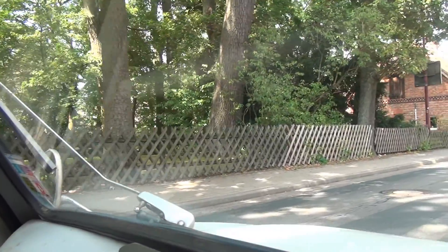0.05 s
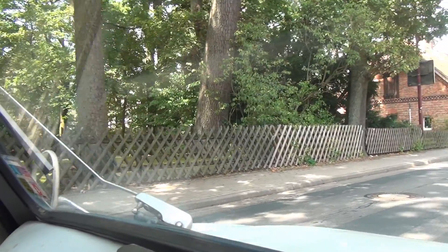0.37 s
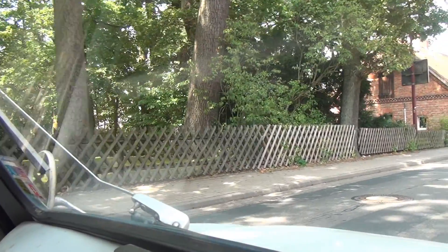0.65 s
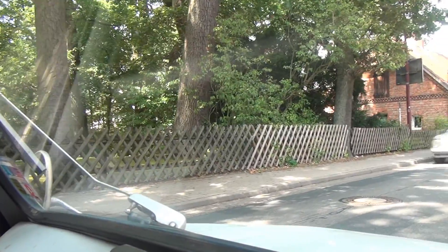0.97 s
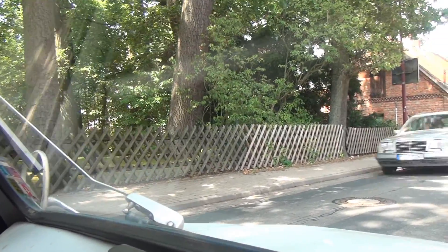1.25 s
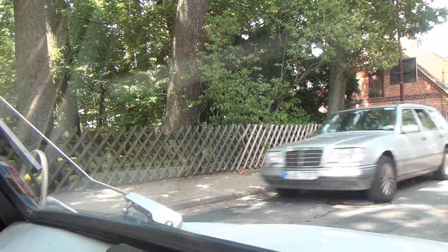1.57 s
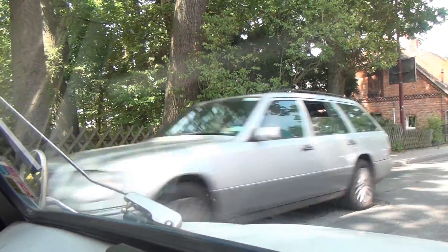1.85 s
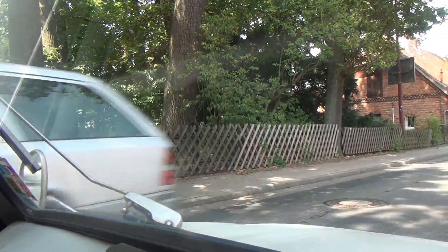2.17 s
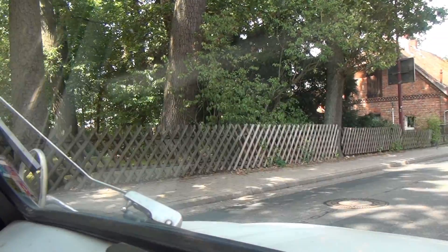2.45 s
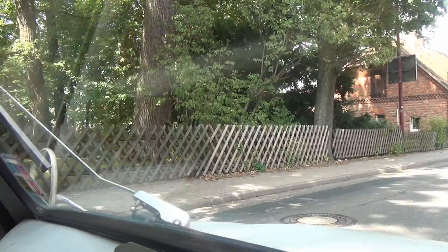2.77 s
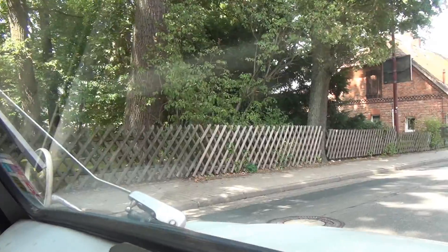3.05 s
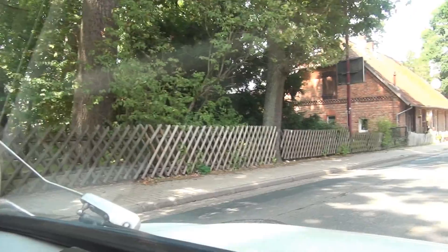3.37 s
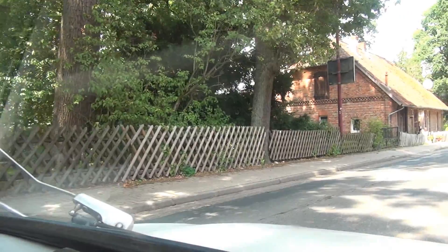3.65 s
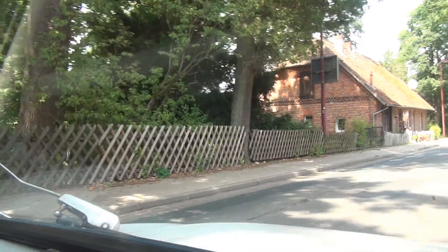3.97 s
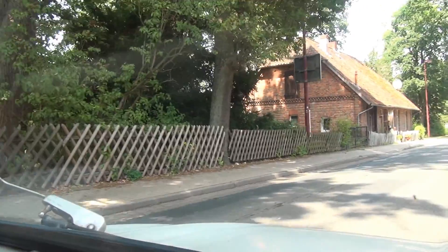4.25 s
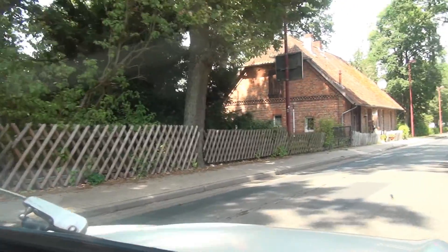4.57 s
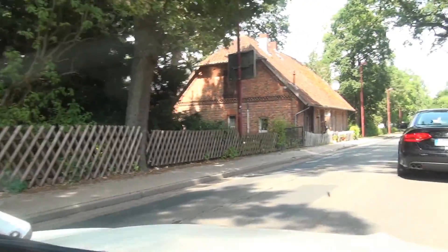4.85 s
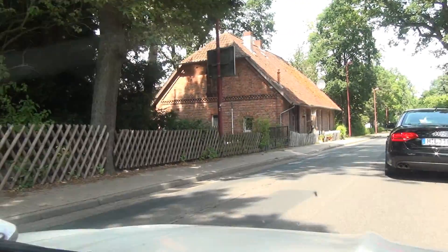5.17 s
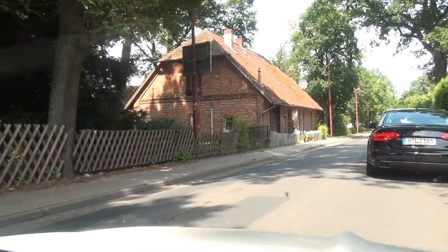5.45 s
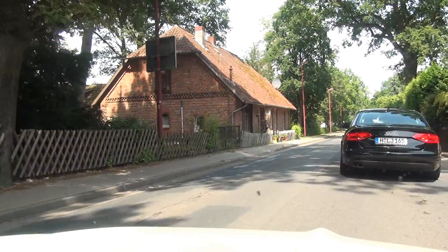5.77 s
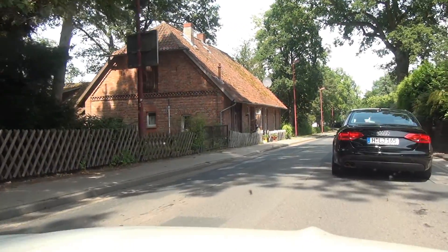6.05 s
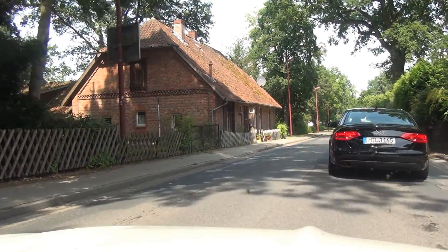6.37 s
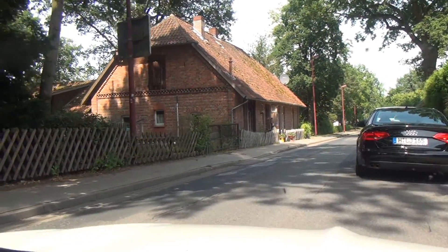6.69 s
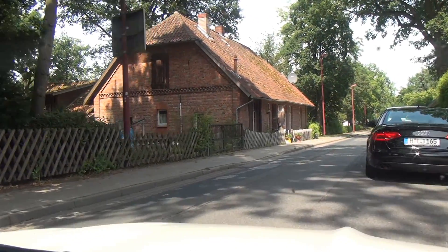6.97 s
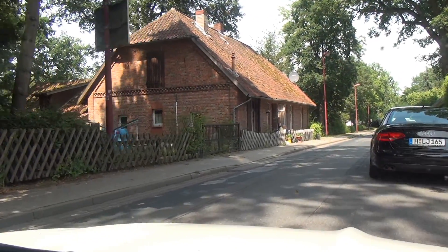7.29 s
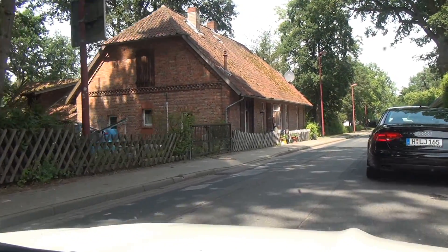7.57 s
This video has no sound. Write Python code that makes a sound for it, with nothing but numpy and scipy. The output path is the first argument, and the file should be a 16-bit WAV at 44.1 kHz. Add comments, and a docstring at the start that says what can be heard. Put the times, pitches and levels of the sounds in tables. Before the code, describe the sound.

A small two-stroke engine burbles with a pulsing lope, heard from inside the car on a village street. Fan rasp, tyre noise and a low rumble lie behind it throughout. Close by, a metal lever clacks four times, in pairs at about 0.5 and 1.2 seconds. Outside, an oncoming car's tyres swell to a roar, peak near 2.4 seconds and fall away quickly by 2.8. The engine then picks up under throttle, stumbling and booming deeply until about 5.2 seconds. During this stretch, road bumps thud through the body and loose trim ticks and rattles. Around 5.5 seconds the engine drops back to its burble, with a brief exhaust bark and a buzzing panel near 6 seconds. It keeps chugging, with a few more light ticks from the trim, until the end at about 7.7 seconds.

```python
"""A two-stroke engine burbles at idle, heard from a stereo pair inside a small car on a village street.
It lopes, one strong burn in every few firings, and the surges come in pairs and ring the cabin air.
Close by, a metal lever clacks four times; outside, a car passes the other way on roaring tyres.
The engine stumbles and booms on throttle for a few seconds, then drops back, while bumps knock the
body and rattle loose trim. Fan and tyre noise lie behind it all."""
import sys
import numpy as np
from scipy.fft import rfft, irfft, next_fast_len
from scipy.io import wavfile
from scipy.ndimage import uniform_filter1d, minimum_filter1d, map_coordinates

SR = 44100
rng = np.random.default_rng(int(sys.argv[2]) if len(sys.argv) > 2 else 0)


def unload_wav(signal):
    """Save mono or channel-first audio to the path in sys.argv[1] as 16-bit WAV at rate SR, clipped to [-1, 1]."""
    wavfile.write(
        sys.argv[1],
        SR,
        np.round(np.clip(np.atleast_2d(signal).T, -1, 1) * 32767).astype(np.int16),
    )


N = 340452

# the engine's lope: (time [s], surges so far [count], firings per surge from then on [count])
LOPE = [(0, 0.6, 4), (2.67, 27, 6), (3.06, 30, 7), (3.61, 34, 7), (3.73, 35, 6), (4.29, 40, 6),
        (5.26, 49, 4), (5.69, 54, 4), (5.89, 56, 4), (6.8, 65, 4), (7.72, 73.8, 4)]
# how the engine runs: (time [s], throttle [0-1], misfiring [0-1])
DRIVE = [(2.7, 0.3, 0.25), (2.9, 0.92, 0.6), (3.3, 0.78, 0.1), (3.55, 0.94, 0.7), (3.8, 0.83, 0.2),
         (4.4, 0.78, 0.87), (5.15, 0.82, 0.93), (5.45, 0.5, 0.26), (5.85, 0.54, 0.43)]
# resonances as they reach the microphones:
# (frequency [Hz], width [Hz], relative level [dB], left over right [dB], left lead [rad])
CABIN_MODES = [(88, 22.5, -9.5, -2.5, 1.75), (114.1, 16.3, -10.5, 11, 1.7), (155, 23, -4, 0.5, 1.45),
               (183.8, 11, -8, -8, 0.75), (203.9, 36.3, -6, 3.5, 1.04)]  # the cabin air
PANEL_MODES = [(273.4, 15.8, 3.5, 2, 1.6), (292.7, 19.6, 3, 1.8, 1.25), (323.2, 24.8, -1.5, 14.3, 2.64),
               (348.3, 26, -7, 2.8, 1.2)]  # the body panels
BUZZ_MODE = [(328.7, 15.6, 0, 13, 1.4)]  # one buzzing panel
SHELL_MODE = [(37.2, 8, 0, 5.5, 0.73)]  # the body shell on its springs
# engine parts that ring: (frequency [Hz], width [Hz], relative level [dB])
FIN_MODES = [(1334, 54, 2), (1620, 300, -2), (2090, 128, 0), (2755, 58, -3.5), (3340, 170, -12),
             (3584, 234, -8)]
INTAKE_MODES = [(574, 53, 7.5), (650, 76, 1), (3220, 800, -11.5)]
# levels in the cabin, before swing and flutter: (time [s], level [dB])
THROB_LEVEL = [(0, -18.5), (2.1, -16), (2.65, -15.5), (2.85, -17), (3.55, -12.5), (4.25, -21), (4.8, -25),
               (5.15, -20), (5.35, -12.5), (5.52, -12), (5.8, -18.5), (7.72, -18)]  # exhaust
GROWL_LEVEL = [(0, -20.5), (2.6, -24), (3.2, -32), (4.2, -25.5), (5.2, -24.5), (5.8, -24.5), (6.5, -23),
               (7.72, -21)]  # body panels
BUZZ_LEVEL = [(0, -35), (2.7, -32.5), (3.3, -31), (5.2, -33.5), (5.8, -21), (6.4, -24.5), (7.0, -27.5),
              (7.72, -37.5)]  # the buzzing panel
SINGING_LEVEL = [(0, -41), (1.2, -44.5), (2.0, -39), (2.5, -30.5), (2.9, -45), (3.6, -66)]  # a narrow band near 1.7 kHz
TYRE_LEVEL = [(0, -30.5), (0.5, -29), (1.1, -30), (1.8, -30), (2.9, -30.5), (3.7, -27.5), (4.1, -30.5),
              (5.1, -30.5), (5.65, -28.5), (6.2, -31.5), (7.72, -30)]  # own tyres on a changing surface
# fan and cylinder noise: (time [s], relative rasp level [dB], hiss level [dB])
FAN_LEVEL = [(0, -33, -55.5), (1, -34.5, -56.5), (3.8, -34.5, -57), (4.7, -35, -58.5), (5.6, -34, -56.5),
             (6.3, -34.5, -55.5), (7.72, -33, -53.5)]
# how far the clatter swings with each surge: (time [s], swing [dB])
CLATTER_SWING = [(0, 0.2), (2.6, 1.8), (4.5, 1.3), (5.5, 0.5), (5.9, 1.7), (7.72, 1.4)]
# fits of the exhaust under throttle: (time [s], relative peak [dB], frequency [Hz])
BOOMS = [(2.82, -26, 49), (2.946, -6.5, 47), (3.032, -11.5, 56.6), (3.153, -10, 60), (3.259, -27, 52.5),
         (3.337, -17, 53), (3.429, -22, 51), (3.55, -14, 49.4), (3.693, -10, 55.5), (3.781, -7.5, 57),
         (3.893, -9.5, 60), (4.019, -10, 50.7), (4.108, -13, 48), (4.176, -12, 47.3), (4.272, -14, 52.4),
         (4.34, -12.5, 52), (4.481, -9.5, 52.4), (4.591, -15, 57.6), (4.688, -12.5, 57.3),
         (4.859, -13, 50.7), (4.92, -14.5, 51.6), (5.13, -18, 48.6)]
# strokes of the lever: (time [s], ring level [dB], knock level [dB])
CLACKS = [(0.5234, -19, -10.5), (0.632, -20, -10), (1.1308, -21.5, -7), (1.2718, -21, -8)]
# the metal lever and its hollow mount: (frequency [Hz], relative level [dB], t60 [s], attack [s])
LEVER_MODES = [(1164, 6.5, 0.084, 0.011), (1910, -10, 0.1, 0.002), (2400, -2.5, 0.082, 0.0022),
               (2670, -9, 0.061, 0.002), (3150, -7.5, 0.091, 0.002), (3920, -20, 0.055, 0.001),
               (11150, -23, 0.078, 0.0004), (11270, -28, 0.089, 0.0004)]
MOUNT_MODES = [(620, 0, 0.059, 0.0012), (695, -6, 0.09, 0.0026), (883, -15.5, 0.06, 0.001)]
# loose trim making contact, relative levels: (time [s], tick [dB], sizzle [dB], clink [dB])
TICKS = [(0.7971, -35, -54, -57), (2.82, -37, -52, -53), (3.076, -28.5, -41.5, -41),
         (3.1303, -29.5, -46, -48), (3.1642, -40, -56, -59), (3.2131, -36, -54, -50),
         (3.283, -32, -52, -61), (3.328, -32, -46, -50), (3.4994, -41, -60, -54), (3.53, -41, -60, -55),
         (3.81, -42, -63, -61), (3.872, -38, -62, -61), (3.926, -40, -62, -57), (4.0941, -37, -63, -55),
         (4.319, -39, -48, -42), (4.338, -61, -58, -50), (4.426, -34.5, -65, -54),
         (4.4556, -36, -68, -40.5), (4.554, -43, -64, -54), (4.685, -37.5, -66, -51),
         (4.745, -48, -57, -50), (4.9561, -55, -71, -45), (5.063, -46, -66, -46), (5.093, -35, -59, -44),
         (5.101, -38, -50, -48), (5.134, -52, -66, -49), (5.175, -38, -52, -54), (5.217, -53, -68, -51),
         (5.246, -52, -62, -50), (6.2776, -32, -49, -44), (7.0978, -54, -54, -63), (7.186, -42, -51, -50),
         (7.3294, -58, -56, -59)]
# road bumps knocking the body: (time [s], level [dB])
BUMPS = [(2.862, -10), (2.889, -10), (3.012, -15.5), (3.076, -12), (3.113, -11.5), (3.14, -13),
         (3.284, -12), (3.55, -21), (3.666, -7), (3.786, -16.5), (3.876, -13), (3.982, -17), (4.455, -19),
         (4.565, -16), (4.683, -19), (5.034, -23), (5.222, -12.5), (5.488, -15)]
# noise spectra at the microphones: (frequency [Hz], relative density [dB])
FAN_SPECTRUM = [(600, 0.5), (900, 2), (1150, -2), (1400, -2), (1700, -4), (1930, -6.5), (2400, -6),
                (3100, -9.5), (3700, -11.5), (4050, -13.5), (4450, -24.5), (5000, -35.5), (6000, -85)]  # cooling fan
HISS_SPECTRUM = [(3500, -21), (4700, -1), (6000, 3.5), (7000, 2), (8000, 3.5), (9000, -2.5), (9700, -7),
                 (11500, -6), (13500, -11), (15500, -25)]  # the fan's treble and small chattering parts
SCRAPE_SPECTRUM = [(1500, -20), (2600, 7), (3900, -10), (4900, -21.5), (9000, -21), (14000, -41)]  # lever between notch and stop
JUDDER_SPECTRUM = [(1300, -14), (1750, 3.5), (2500, -2), (3150, 3), (3600, -10), (3900, 3.5), (4400, -12),
                   (5000, -30), (8000, -17), (10000, -29), (11200, -14), (12200, -39), (15000, -37)]  # lever against its stop
ROAR_SPECTRUM = [(200, -4), (440, 13.5), (650, 3.5), (850, 10.5), (1000, -2.5), (1150, 1.5), (1340, 3.5),
                 (1530, 5), (1800, -7), (2000, -0.5), (2250, -9), (2780, -4.5), (3150, -7.5), (3700, -8.5),
                 (4800, -28.5), (7000, -72)]  # the other car's tyres
TREAD_SPECTRUM = [(3500, -5), (4800, -8.5), (6300, -2.5), (8000, -3), (9800, -14), (12300, -12.5),
                  (15500, -29)]  # their tread hiss
BUMP_SPECTRUM = [(120, -21), (310, 16.5), (480, 2), (590, 7.5), (850, -2), (1300, -10.5), (2050, -6.5),
                 (2600, -13), (3300, -15), (5000, -66)]  # knocked bodywork
TICK_SPECTRUM = [(900, -23), (1900, 18.5), (2600, 12.5), (3700, 14), (4800, -0.5), (7000, -6), (7900, 6.5),
                 (9200, -7), (12000, -36), (15500, -35)]  # loose trim
SIZZLE_SPECTRUM = [(7000, -19), (10500, 4), (12500, 1), (14500, -7), (15600, -15)]  # the top of each tick
TYRE_SPECTRUM = [(200, -12), (400, 3.5), (490, 0.5), (560, 3.5), (700, -2), (840, 1.5), (960, -9.5),
                 (1250, -13.5), (2000, -14.5), (4000, -50.5)]  # own tyres
RUMBLE_SPECTRUM = [(15, -22), (30, 0.5), (52, 5), (69, -2), (92, 4.5), (140, -2), (190, 0), (243, -11.5),
                   (330, -2.5), (420, -21.5), (700, -69)]  # low cabin rumble
# how alike cabin noise is at the two microphones: (frequency [Hz], coherence [0-1])
COHERENCE = [(60, 0.42), (360, 0.48), (640, 0.71), (1200, 0.71), (2100, 0.93), (3700, 0.89), (4800, 0.41)]
# which side it favours: (frequency [Hz], left over right [dB])
BALANCE = [(60, 10), (300, 3), (600, -0.5), (1000, -1), (3800, 0.3), (5000, 6), (14000, 1.5)]
# the pair widens and narrows the treble: (frequency [Hz], side gain [dB])
STEREO_WIDTH = [(4000, 0), (5000, 11), (6100, 8.5), (7300, -1), (8500, -3), (9600, 12), (11000, 0),
                (12000, 3.5)]


def crank():
    """Firings and surges counted since the start; the flywheel smooths each change of speed."""
    t = np.arange(N) / SR
    times, surges, per_surge = np.transpose(LOPE)
    surge = np.interp(t, times, surges)
    step = np.gradient(surge) * per_surge[np.searchsorted(times, t, side="right") - 1]
    cycle = surges[0] * per_surge[0] + np.cumsum(uniform_filter1d(step, size=5000))
    return cycle + 0.034 * wobble(14), surge


def exhaust_throb(cycle, surge):
    """The exhaust throbs at the firing rate; misfires lose the note and shake the shell at its own pitch."""
    _, misfire = curves(DRIVE)
    steady = np.sqrt(2) * np.real(mic_pair(5.2, 1.2) * amp(0.46 * wobble(30)) * np.exp(2j * np.pi * cycle))
    lurch = resonate(firings(cycle, scatter=0.56, jitter_s=0.001, puff=0.61), SHELL_MODE)
    throb = np.sqrt(1 - misfire ** 2) * steady + misfire * lurch
    return amp(curves(THROB_LEVEL)[0] + lope(surge, -0.25)) * throb


def cabin_drone(cycle, surge):
    """Strong and weak burns ring the air around the microphones; every other surge is stronger."""
    _, misfire = curves(DRIVE)
    burn = amp(5.3 * lope(surge, 0.25) + 2 * lope(surge / 2, 0))
    drone = resonate(burn * firings(cycle, scatter=0.45, jitter_s=0.0008, puff=0.15), CABIN_MODES)
    return amp(-22 - 3 * misfire + 0.68 * lope(surge, 0.031) + 0.27 * wobble(22)) * drone


def chug(surge):
    """Each surge swells the cabin's main resonance and lets it die, a little different every time."""
    throttle, _ = curves(DRIVE)
    times, surges, _ = np.transpose(LOPE)
    nearest = np.round(surge).astype(int)
    size, detune, shift = rng.standard_normal((nearest[-1] + 1, 3))[nearest].T
    since = np.arange(N) / SR - np.interp(nearest, surges, times)
    alternate = (-1.0) ** nearest  # the lope repeats in pairs
    hz = 116.6 - 11 * throttle + 3 * alternate + 0.9 * detune
    phase = 0.5 * alternate + 0.25 * shift
    note = np.real(mic_pair(2.1, 1.0) * np.exp(1j * (2 * np.pi * hz * since + phase)))
    envelope = amp(0.9 * size) * np.cos(np.pi * (surge - nearest))
    return amp(-20 - 0.5 * throttle) * unit(envelope * note)


def exhaust_booms(half_length_s=0.024, gain_db=2.1):
    """Each fit of the exhaust swells the lowest standing waves of the cabin for a few cycles."""
    t, out = np.arange(N) / SR, np.zeros((2, N))
    for (time, db, hz), (phase, lead) in zip(BOOMS, rng.random((len(BOOMS), 2))):
        near = np.abs(t - time) < 4 * half_length_s
        since = t[near] - time
        note = np.real(mic_pair(5.7, 1.4 + 1.05 * lead) * np.exp(2j * np.pi * (hz * since + phase)))
        out[:, near] += amp(db + gain_db) * np.exp(-(since / half_length_s) ** 2 / 2) * note
    return out


def exhaust_bark(cycle, surge, bark_s=6, half_length_s=0.12):
    """The exhaust's fourth harmonic hums at idle and barks briefly with the surges around 6 s."""
    throttle, _ = curves(DRIVE)
    window = np.exp(-((np.arange(N) / SR - bark_s) / half_length_s) ** 2 / 2)
    bark = amp(-25 + 12 * lope(surge, 0.52) + 1.3 * wobble(21.1)) * window
    hum = amp(-31 + 0.89 * wobble(6.9)) * (1 - throttle)
    return (bark + hum) * np.sqrt(2) * np.real(mic_pair(4.0, 1.3) * np.exp(2j * np.pi * 4 * cycle))


def panels(cycle, surge):
    """Firings and their gas noise shake the body panels into a growl; one panel buzzes along."""
    throttle, _ = curves(DRIVE)
    growl = resonate(firings(cycle, scatter=0.64, jitter_s=0.00071, puff=0.5), PANEL_MODES)
    buzz = resonate(firings(cycle, scatter=0.21, jitter_s=0.00083, puff=0.44), BUZZ_MODE)
    swing_db = 2.9 * (1 - throttle) * lope(surge, -0.54) + 2 * limp(surge) + 0.6 * wobble(22)
    return amp(curves(GROWL_LEVEL)[0] + swing_db) * growl + amp(curves(BUZZ_LEVEL)[0]) * buzz


def engine_clatter(cycle, surge):
    """The fan rasps and the fins and intake ring with each firing, swelling with the lope."""
    throttle, _ = curves(DRIVE)
    fan_db, hiss_db = curves(FAN_LEVEL)
    firing_db = 0.35 * np.cos(2 * np.pi * cycle)
    surge_db = curves(CLATTER_SWING)[0] * lope(surge, 0.042 + 0.28 * throttle) + 0.7 * limp(surge)
    rasp = amp(firing_db + wobble(130) + surge_db)
    fan = amp(fan_db + 1.6) * unit(rasp * rush(FAN_SPECTRUM))
    slap = amp(firing_db + 1.96 * wobble(40) + 0.9 * surge_db)
    fins = amp(fan_db - 6 + throttle) * unit(slap * ring(FIN_MODES))
    hiss = amp(hiss_db) * unit(rasp ** 0.39 * amp(1.2 * wobble(29)) * rush(HISS_SPECTRUM))
    intake = amp(-32) * throttle ** 2 * unit(slap * ring(INTAKE_MODES))
    # a narrow band sings, pulsing with the firings and swelling as the other car passes
    singing = amp(curves(SINGING_LEVEL)[0]) * unit(slap * ring([(1728, 220, 0)]))
    return fan + fins + hiss + intake + singing


def lever(stop_delay_s=0.0168):
    """Close by, the lever rings out of its notch, scrapes, then knocks its mount and judders at the stop."""
    times, ring_db, knock_db = np.transpose(CLACKS)
    stops = times + stop_delay_s
    scrape = blows(times, ring_db - 3, attack=0.0095, t60=0.18)
    scrape = scrape * amp(3 * wobble(400)) * rush(SCRAPE_SPECTRUM)
    judder = blows(stops, ring_db - 4, attack=0.003, t60=0.091)
    judder = judder * unit(amp(2.5 * wobble(300)) * rush(JUDDER_SPECTRUM))
    return struck(times, ring_db, LEVER_MODES) + scrape + judder + struck(stops, knock_db, MOUNT_MODES)


def oncoming_car(nearest_s=2.283, distance_over_speed_s=0.45, hidden_s=2.733, fade_s=0.035):
    """Outside, another car's tyres roar and hiss past until it slips behind the bodywork."""
    t = np.arange(N) / SR
    roar = rush(ROAR_SPECTRUM)
    # the bounce off the road lags most when the car is nearest, so a comb sweeps down and back up
    lag_s = 0.001106 / np.hypot(1, (t - nearest_s) / distance_over_speed_s)
    bounce = np.array([np.interp(t - lag_s, t, channel) for channel in roar])
    tyres = amp(-20.5) * swell(peak_s=2.457, rise_s=0.29, fall_s=0.26) * unit(roar + 0.28 * bounce)
    tread = amp(-45) * swell(peak_s=2.32, rise_s=0.17, fall_s=0.26) * rush(TREAD_SPECTRUM)
    in_view = (1 - np.tanh((t - hidden_s) / fade_s / 2)) / 2
    flutter = amp(0.7 * wobble(29.98) + 0.68 * wobble(140))
    return in_view * flutter * (tyres + tread)


def bumps():
    """Road bumps thud in the body, their attack softened by tyres and springs."""
    times, levels_db = np.transpose(BUMPS)
    return blows(times, levels_db, attack=0.007, t60=0.11) * rush(BUMP_SPECTRUM)


def loose_trim(bounce_s=0.015, bounce_db=-14, chatter_from_s=3.1, chatter_to_s=7.5):
    """Trim around the cabin ticks and bounces once; small parts chatter faintly in between."""
    times, tick_db, sizzle_db, clink_db = np.transpose(TICKS)
    contacts = np.r_[times, times + bounce_s]
    tick = blows(contacts, np.r_[tick_db, tick_db + bounce_db] + 3.5, attack=0.00055, t60=0.078)
    sizzle = blows(contacts, np.r_[sizzle_db, sizzle_db + bounce_db] + 4, attack=0.0003, t60=0.043)
    clink = blows(times, clink_db + 2.5, attack=0.0003, t60=0.048)
    trim = tick * rush(TICK_SPECTRUM) + sizzle * rush(SIZZLE_SPECTRUM) + clink * ring([(5730, 2500, 0)])
    when, force = rng.random((45, 2)).T
    chatter_times = chatter_from_s + when * (chatter_to_s - chatter_from_s)
    chatter = blows(chatter_times, -60 + 14 * force ** 2, attack=0.0003, t60=0.016)
    return trim + chatter * rush(HISS_SPECTRUM)


def road_noise():
    """Under the floor, the car's own tyres roar on the road, over a steady low rumble."""
    flutter = amp(1.35 * wobble(20) + 0.8 * wobble(60))
    tyres = amp(curves(TYRE_LEVEL)[0]) * unit(flutter * rush(TYRE_SPECTRUM))
    return tyres + amp(-20) * rush(RUMBLE_SPECTRUM)


def firings(cycle, scatter, jitter_s, puff):
    """One pressure pulse per firing, uneven in size and time, each followed by a puff of gas noise."""
    starts = np.flatnonzero(np.diff(np.floor(cycle)) > 0)
    size, delay = rng.standard_normal((len(starts), 2)).T
    at = np.clip(starts + jitter_s * SR * delay, 0, N - 1).astype(int)
    pulses = np.bincount(at, np.abs(1 + scatter * size), N)
    gas = np.exp(-2 * (cycle % 1)) * rng.standard_normal(N)
    return unit(pulses) + puff * unit(gas)


def lope(surge, lead):
    """A swing (-1 to 1) that peaks ahead of the chug by lead, a share of one surge."""
    return np.cos(2 * np.pi * (surge + lead))


def limp(surge):
    """The swing of three lighter beats in each pair of surges; throttle evens it out."""
    throttle, _ = curves(DRIVE)
    return np.clip(2 * (1 - throttle), 0, 1) * lope(surge * 3 / 2, 0)


def resonate(x, modes):
    """x rings modes that reach each microphone differently; slow swells are levelled to rms 1."""
    ringing = unit(filtered(x, lambda f: sum(amp(db) * resonance(f, hz, width) * mic_pair(side_db, lead)
                                             for hz, width, db, side_db, lead in modes)))
    power = uniform_filter1d(uniform_filter1d(np.mean(ringing ** 2, axis=0), size=2600), size=1800)
    return ringing / np.sqrt(np.abs(power) + 1e-6)


def struck(times, levels_db, modes):
    """Blows set an object's modes ringing, a little differently each time."""
    out, t = np.zeros((2, N + SR)), np.arange(SR // 4) / SR
    for time, db, chance in zip(times, levels_db, rng.standard_normal((len(times), len(modes), 3))):
        for (hz, mode_db, t60, attack), (size, detune, phase) in zip(modes, chance):
            note = np.exp(2j * np.pi * (hz * (1 + 0.0031 * detune) * t + phase))
            envelope = amp(db + mode_db + size - 60 * t / t60) * (1 - np.exp(-t / attack))
            out[:, int(time * SR):][:, :len(t)] += envelope * np.real(mic_pair(-0.88, 0.69) * note)
    return out[:, :N]


def blows(times, levels_db, attack, t60):
    """The envelope of blows that rise fast and die away; attack and t60 are in seconds."""
    power, t = np.zeros(N + SR), np.arange(SR // 2) / SR
    shape = (1 - np.exp(-t / attack)) * amp(-60 * t / t60)
    for time, db in zip(times, levels_db):
        power[int(time * SR):][:len(t)] += (amp(db) * shape) ** 2
    return np.sqrt(power[:N])


def swell(peak_s, rise_s, fall_s):
    """A gain that climbs to 1 and sinks again; rise and fall are the times to half power."""
    t = np.arange(N) / SR - peak_s
    return 1 / (1 + (np.sqrt(2) - 1) * (t / np.where(t < 0, rise_s, fall_s)) ** 2)


def cabin_noise(gain):
    """Noise of rms 1, partly alike at the two microphones, coloured by a gain of frequency."""
    def mid_side_gain(f):
        angle = np.arccos(along(COHERENCE, f)) / 2
        return gain(f) * np.array([np.cos(angle), np.sin(angle)])
    mid, side = filtered(rng.standard_normal((2, N)), mid_side_gain)
    return unit(filtered(np.array([mid + side, mid - side]), lambda f: mic_pair(along(BALANCE, f), 0)))


def rush(spectrum):
    """Cabin noise with a broad spectrum."""
    return cabin_noise(lambda f: amp(along(spectrum, f)))


def ring(modes):
    """Cabin noise held in resonances."""
    return cabin_noise(lambda f: sum(amp(db) * abs(resonance(f, hz, width)) for hz, width, db in modes))


def mic_pair(balance_db, lead_rad):
    """Complex gains at the two microphones: the left is louder by balance_db and ahead by lead_rad."""
    sign = np.array([[0.5], [-0.5]])
    return amp(sign * balance_db) * np.exp(1j * sign * lead_rad)


def resonance(f, hz, width):
    """A resonance with steep skirts."""
    return (1j * f * width / (hz * hz - f * f + 1j * f * width)) ** 2


def filtered(x, response):
    """x through a complex response of frequency."""
    size = next_fast_len(N + SR // 2)
    return irfft(rfft(x, size) * response(np.fft.rfftfreq(size, 1 / SR)), size)[..., :N]


def wobble(rate):
    """A smooth random curve, rate knots a second."""
    return map_coordinates(rng.standard_normal(4096), [np.arange(N) * rate / SR], mode="mirror")


def curves(rows):
    """One value per sample for each column after the time."""
    times, *columns = np.transpose(rows)
    return [np.interp(np.arange(N) / SR, times, column) for column in columns]


def along(points, hz):
    """Interpolates (frequency, value) points on a log axis."""
    freqs, values = np.transpose(points)
    return np.interp(np.log(hz + 1), np.log(freqs), values)


def amp(db):
    """Decibels to amplitude."""
    return 10 ** (np.asarray(db) / 20)


def unit(x):
    """x at rms 1."""
    return x / np.sqrt(np.mean(x ** 2) + 1e-20)


def scene():
    """Everything that reaches the microphones in the cabin."""
    cycle, surge = crank()
    engine = exhaust_throb(cycle, surge) + cabin_drone(cycle, surge) + panels(cycle, surge)
    engine += chug(surge) + exhaust_booms() + exhaust_bark(cycle, surge) + engine_clatter(cycle, surge)
    return engine + road_noise() + oncoming_car() + lever() + loose_trim() + bumps()


def record(dry, ceiling=0.93, top_hz=15700):
    """The microphone pair colours the stereo width; a limiter holds the peaks and the very top is cut."""
    mid = (dry[0] + dry[1]) / 2
    side = filtered((dry[0] - dry[1]) / 2, lambda hz: amp(along(STEREO_WIDTH, hz)))
    pair = np.array([mid + side, mid - side])
    needed = np.minimum(1, ceiling / (np.abs(pair).max(axis=0) + 1e-9))
    gain = uniform_filter1d(minimum_filter1d(needed, size=600), size=500)
    return filtered(pair * gain, lambda hz: hz < top_hz)


dry = scene()
out = record(dry)
unload_wav(out)
```